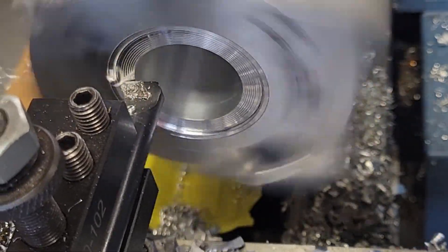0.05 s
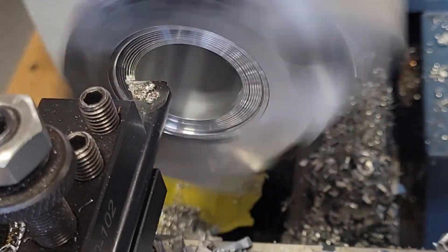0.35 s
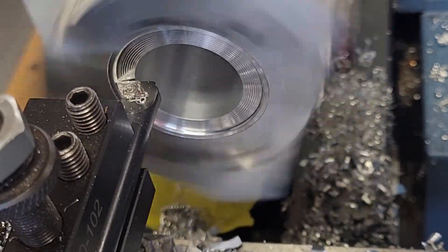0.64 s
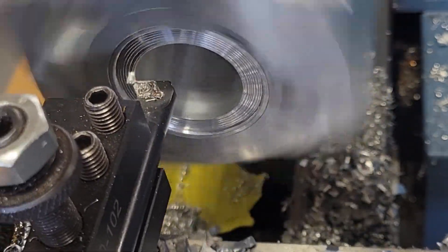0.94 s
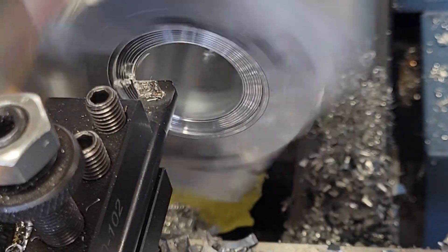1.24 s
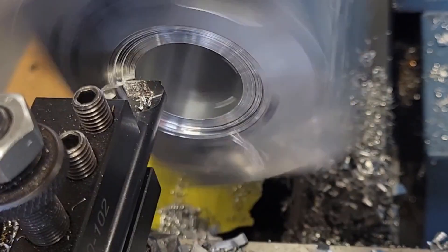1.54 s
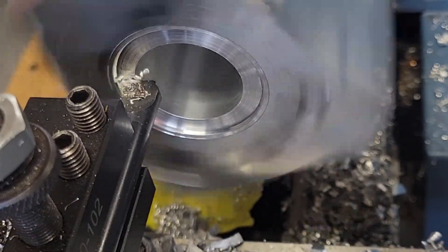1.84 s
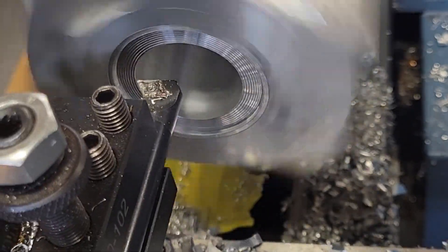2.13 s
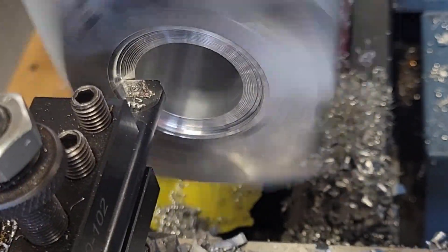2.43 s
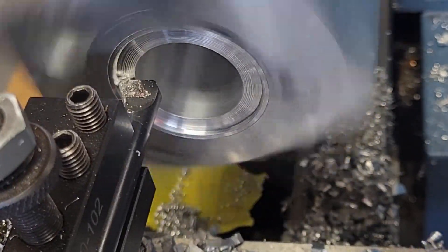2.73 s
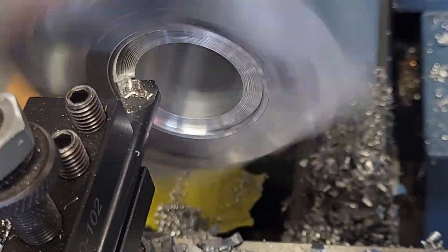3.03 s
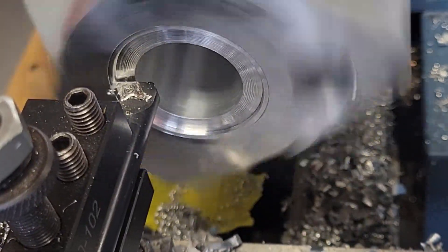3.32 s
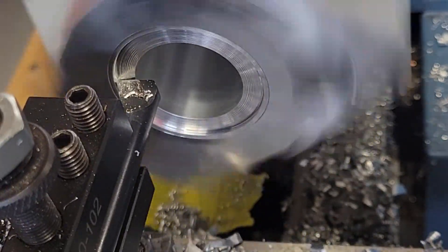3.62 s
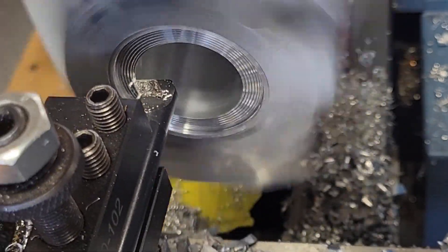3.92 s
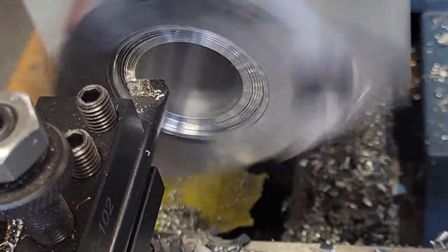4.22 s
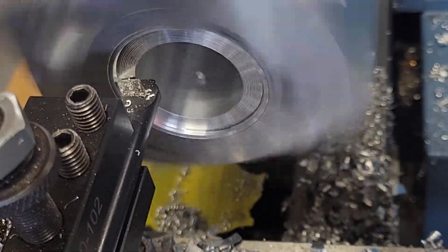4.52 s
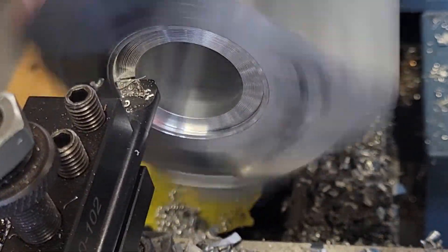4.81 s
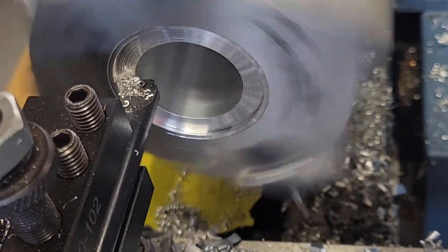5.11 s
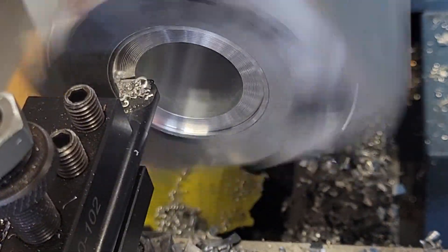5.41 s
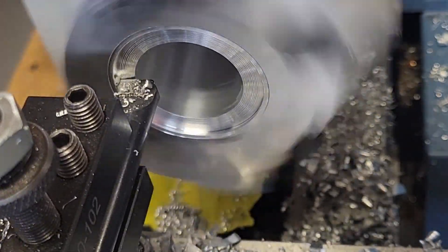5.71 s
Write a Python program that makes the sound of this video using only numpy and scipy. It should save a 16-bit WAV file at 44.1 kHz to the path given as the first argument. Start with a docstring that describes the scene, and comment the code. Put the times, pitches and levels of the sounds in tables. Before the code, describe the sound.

Close above the cutting tool in a workshop, a lathe scrapes a spinning metal part in rapid, gritty strokes over a steady rubbing hiss. The cut comes in uneven surges, with short squeals in the gaps and crisp snaps as jammed chips break free. After a louder crackling stretch in the first half, it keeps surging, then settles into steadier chatter with a thin metallic ring. A faint gear whine runs throughout.

```python
"""Lathe facing a metal ring

Chip after chip catches, runs and breaks off, shearing in quick strong-weak strokes of tiny fractures
that ring tool, work and chuck. The tool rubs and hisses throughout and squeals, mostly between chips.
Jammed chips crack free; drive and gears whine faintly. Heard above the tool post in a workshop."""
import sys
import numpy as np
from scipy import signal
from scipy.fft import rfft, irfft, next_fast_len
from scipy.io import wavfile
from scipy.ndimage import uniform_filter1d

SR = 44100
rng = np.random.default_rng(int(sys.argv[2]) if len(sys.argv) > 2 else 0)


def generate_wav(signal):
    """Clip the signal to [-1, 1] and save it as 16-bit WAV at the path in sys.argv[1]."""
    frames = np.transpose(np.atleast_2d(signal))
    scaled = np.clip(frames, -1, 1) * 32767
    pcm = np.round(scaled).astype(np.int16)
    wavfile.write(sys.argv[1], SR, pcm)


N = 258243
TIME_S = np.arange(N) / SR
N_FFT = next_fast_len(N)
FREQ_HZ = np.maximum(np.arange(N_FFT // 2 + 1) * SR / N_FFT, 1)
SKIM_SCRAPE_DB = -36  # between chips

# contact spectra ahead of the metal's resonances: freq_hz, gain_db
TEAR_SPECTRUM = [(100, -53), (300, -47), (600, -30), (900, -10.5), (1300, -10.5), (1800, -1), (2300, 7.5),
                 (3000, -11.5), (3700, -4), (5000, 3), (8000, -76), (15000, -42)]
SHANK_SPECTRUM = [(1200, -35.5), (2000, -13.5), (2500, -0.5), (2750, -3), (3100, -7), (3700, 3),
                  (4400, -25), (8000, -36)]
SCRAPE_SPECTRUM = [(200, -73), (700, -23), (1500, -15.5), (2600, -20), (3400, -4.5), (4200, -1), (5200, 2),
                   (6500, -2.5), (8000, -6.5), (11000, -10), (15500, -5)]


def cut(metal, unloaded_hz=88.02, sag_hz=5.5, full_load_db=-30, jitter_strokes=.08):
    """Each stroke tears, scrapes the chip, bends the shank and rubs the flank; load slows the strokes."""
    # flank rub: freq_hz, gain_db
    rub_spectrum = [(200, -37.5), (700, -18), (1300, -17), (2500, -14.5), (4000, -20.5), (5500, -16),
                    (7500, 2), (9000, -1), (11000, 0.5), (15500, -1.5)]
    tear_gain, shank_gain, scrape_gain, sing_gain, depth = chip_engagement()
    load = uniform_filter1d(tear_gain, SR // 10) / undb(full_load_db)
    strokes = np.cumsum(unloaded_hz - sag_hz * load) / SR + jitter_strokes * wander(80)
    # the rub grows as the tool feeds in, and with the scrape
    rub_gain = undb(-35.5 + .5 * TIME_S) * (scrape_gain / undb(SKIM_SCRAPE_DB)) ** .15
    shear = stroke_force(strokes, depth, lag=.1, crest=.4, weak_db=-4, scatter_db=1.2)
    bend = stroke_force(strokes, depth, lag=.33, crest=.5, weak_db=-4, scatter_db=1.1)
    drag = stroke_force(strokes, .8 * depth, lag=.12, crest=.55, weak_db=-5, scatter_db=.8)
    # the flank touches going in and springing back
    touch = stroke_force(2 * strokes, .5 * depth, lag=.6, crest=.45, weak_db=-2, scatter_db=.6)
    tear = contact(shear, TEAR_SPECTRUM, metal, grit_db=3.8) * tear_gain
    shank = contact(bend, SHANK_SPECTRUM, metal, grit_db=2) * shank_gain * undb(.8 * wander(110))
    scrape = contact(drag, SCRAPE_SPECTRUM, metal, grit_db=2.5) * scrape_gain
    rub = contact(touch, rub_spectrum, metal, grit_db=2.5) * rub_gain
    dip_db = lull_db()
    hiss = chip_curl(undb(dip_db) * scrape + undb(.45 * dip_db) * rub)
    singing = sing_gain * shank_singing(bend, metal)
    return undb(dip_db) * (tear + shank) + hiss + singing + tool_ring(strokes, metal)


def chip_engagement(catch_s=.012, break_s=.01):
    """Four gains and a stroke depth: each chip catches, eases or tightens, then breaks back to a skim."""
    # start_s, end_s, tear_db, shank_db, scrape_db, sing_db, ease_db, stroke_depth
    chips = [(0, 0.236, -43.5, -38, -34.5, -52, -0.5, 0.41),
             (0.284, 0.361, -49.5, -41.5, -38.5, -61, -4.5, 0.33),
             (0.362, 0.545, -41, -36.5, -35, -55, 3.5, 0.4), (0.53, 0.767, -49, -50, -37.5, -51, -3, 0.2),
             (0.774, 0.997, -43, -37, -33.5, -45, 1, 0.5),
             (1.211, 1.312, -38.5, -39.5, -34.5, -35.5, -1, 0.47),
             (1.327, 1.486, -32, -36.5, -33, -40, 0.5, 0.2),
             (1.485, 1.718, -30, -33.5, -32, -39, 5.5, 0.22),
             (1.715, 1.913, -36.5, -42.5, -31.5, -50, 7.5, 0.24),
             (1.917, 2.112, -47.5, -40.5, -34.5, -50, -2, 0.46),
             (2.228, 2.46, -40.5, -39, -36, -43.5, 3, 0.2), (2.44, 2.91, -45.5, -44, -34, -51, 1.5, 0.37),
             (2.917, 3.192, -40, -40, -33, -44.5, 8, 0.3), (3.342, 3.629, -37, -38, -31.5, -47, 8.5, 0.4),
             (3.636, 3.762, -49.5, -48.5, -39, -47, -3, 0.44),
             (3.783, 3.97, -45, -37.5, -34.5, -46.5, 4.5, 0.3),
             (4.101, 4.426, -37, -36, -33.5, -40.5, -1.5, 0.47),
             (4.44, 4.592, -41.5, -45, -40.5, -66, 14, 0.36),
             (4.596, 4.797, -51.5, -47.5, -39, -41.5, -11.5, 0.53),
             (4.799, 4.869, -37.5, -41, -33.5, -33.5, 7, 0),
             (4.876, 5.216, -41, -42.5, -34, -41.5, 0, 0.33),
             (5.213, 5.6, -43.5, -46.5, -33.5, -41.5, -1.5, 0.4),
             (5.602, 5.86, -45, -48, -32.5, -39, 1, 0.43)]
    t = TIME_S[::SR // 1000]
    gains = undb([-50, -61, SKIM_SCRAPE_DB, -89])[:, None]  # skim: tear, shank, scrape, sing
    depth = .056
    for start_s, end_s, tear_db, shank_db, scrape_db, sing_db, ease_db, stroke_depth in chips:
        hold = np.clip((t - start_s) / catch_s, 0, 1) * np.exp(-np.maximum(t - end_s, 0) / break_s)
        eased_db = ease_db * np.clip((t - start_s) / (end_s - start_s), 0, 1)
        levels_db = tear_db - eased_db, shank_db - .25 * eased_db, scrape_db, sing_db
        gains = np.maximum(gains, [hold * undb(db) for db in levels_db])
        depth = depth + hold * (stroke_depth - depth)
    return [np.interp(TIME_S, t, control) for control in (*gains, depth)]


def stroke_force(strokes, depth, lag, crest, weak_db, scatter_db):
    """Steady drag plus a surge per stroke, every second one offset by weak_db; lag, crest in strokes."""
    index, age = np.divmod(strokes + 2 - lag, 1)
    index = index.astype(int)
    size = undb(scatter_db * rng.standard_normal(N // 100)[index] + weak_db * (index % 2))
    surge = unit_rms(size * np.interp(age, [0, crest, 1], [0, 1, 0]) ** 2)
    return unit_rms(1 - depth + depth * surge)


def contact(force, spectrum, metal, grit_db):
    """Dense micro-fractures of uneven size ring the metal; stereo, rms 1."""
    sizes = undb(grit_db * np.repeat(rng.uniform(-1.7, 1.7, N // 16 + 1), 16)[:N])
    grains = stereo_spectrum(rng.standard_normal((3, N)) * sizes * force)
    return unit_rms(irfft(grains * metal * undb(over_freq(spectrum)), N_FFT)[:, :N])


def metal_response():
    """Left and right frequency response of tool, work and chuck; each mode rings on once struck."""
    # freq_hz, width_hz, left_db, right_db
    modes = [(960.0, 105.0, 12.5, 13.5), (1165.0, 60.0, 5.0, 9.5), (1444.0, 204.0, 10.5, 11.0),
             (1780.0, 199.0, 8.5, 9.0), (2232.0, 134.0, 3.0, 3.5), (2635.0, 170.0, 11.5, 10.0),
             (2822.0, 122.0, 3.0, 6.5), (3040.0, 379.0, 16.5, 11.0), (3295.0, 118.0, 2.0, 5.0),
             (3630.0, 200.0, 2.0, 4.5), (3860.0, 120.0, 4.0, 6.0), (4310.0, 149.0, 2.5, 3.5),
             (5020.0, 160.0, 6.5, 5.0), (5585.0, 210.0, 2.0, 8.0), (6009.0, 84.0, 4.0, 10.0),
             (6582.0, 410.0, 4.0, 6.0), (6895.0, 132.0, 8.5, -0.0), (7292.0, 333.0, 7.0, 8.5),
             (7690.0, 200.0, 4.5, 6.0), (8378.0, 455.0, 6.0, 6.5), (8731.0, 196.0, 7.5, 1.0),
             (8910.0, 125.0, 3.5, 9.5), (9304.0, 664.0, 5.5, 8.5), (10110.0, 260.0, 6.5, 8.0),
             (10765.0, 150.0, 0.5, 4.0), (11201.0, 438.0, 4.5, 8.5), (11649.0, 150.0, 1.5, 5.5),
             (12295.0, 435.0, 3.5, 4.0), (12860.0, 190.0, 3.5, 8.0), (13445.0, 700.0, 3.5, 5.5),
             (14705.0, 465.0, 3.5, -2.0)]
    # where the parts' motions cancel: freq_hz, width_hz, gain_db
    notches = [(1272, 80, -3.5), (3400, 100, -3.5), (4650, 300, -2.5), (7920, 200, -2.5)]
    # parts radiate with different signs, so the sides differ in phase: freq_hz, lead_rad
    left_lead = [(2400, 0), (2750, -.7), (3100, -2.6), (3380, -3.1), (3500, 0), (3950, -.2), (4150, -2.4),
                 (4500, -2.4), (4700, -1), (5300, -1.7), (5550, .7), (6050, 0), (6500, -2.7), (6850, .3),
                 (7100, -2.4), (8000, -3), (8450, -2.1), (8650, 0), (8850, -2.3), (9500, -3), (9900, -1.7),
                 (10600, -2.6), (11600, -.6), (11950, -3), (12900, -1.5), (14600, -3.3), (15100, -.4)]
    mode_hz, width_hz, left_db, right_db = np.transpose(modes)
    peaks = 1 / (1 + (2 * (FREQ_HZ[:, None] - mode_hz) / width_hz) ** 2)
    dips_db = sum(db / (1 + (2 * (FREQ_HZ - hz) / span_hz) ** 2) for hz, span_hz, db in notches)
    log_gain = np.log(undb([peaks @ left_db + dips_db, peaks @ right_db + dips_db]))
    cepstrum = irfft(log_gain, N_FFT)
    minimum_phase = rfft(2 * cepstrum.mean(0)[:N_FFT // 2], N_FFT).imag
    phase = np.array([minimum_phase, minimum_phase - over_freq(left_lead)])
    return np.exp(log_gain + 1j * phase)


def lull_db(edge_s=.015):
    """The level dips where the tool barely touches."""
    # start_s, end_s, dip_db
    lulls = [(0.243, 0.315, -1), (1.005, 1.1, -1), (1.1, 1.202, -5), (2.12, 2.225, -2), (3.19, 3.337, -1),
             (3.644, 3.76, -1), (3.982, 4.094, -3)]
    return sum(dip_db * np.clip(np.minimum(TIME_S - start_s, end_s - TIME_S) / edge_s + .5, 0, 1)
               for start_s, end_s, dip_db in lulls)


def chip_curl(hiss, drift_db=.6, flicker_db=1.3):
    """As the chip curls, each band of the hiss drifts and flickers on its own."""
    # centre_hz
    bands = [3000, 4400, 5200, 6000, 7000, 8000, 9000, 10200, 11400, 12800, 14500]
    spectrum, out = rfft(hiss, N_FFT), 0
    for weights in np.eye(len(bands)):
        band = irfft(spectrum * np.interp(FREQ_HZ, bands, weights), N_FFT)[:, :N]
        out = out + band * undb(drift_db * wander(12) + flicker_db * wander(190))
    return out


def shank_singing(bend, metal, wander_hz=72, octave_db=-11, flutter_db=5):
    """Strokes pump the shank's bending mode; it sputters and wanders, and the chip slaps an octave up."""
    # settles higher in steady chatter: time_s, pitch_hz
    bending_mode = [(0, 2648), (4.6, 2669), (4.85, 2776), (5.2, 2690), (5.55, 2753), (5.66, 2690),
                    (5.86, 2793)]
    phase = phase_rad(over_time(bending_mode) + wander_hz * wander(420))
    grip = undb(flutter_db * np.tanh(wander(130)))
    slap = undb(octave_db + flutter_db * np.tanh(wander(86)))
    return resonate(bend * grip * (np.sin(phase) + slap * np.sin(2 * phase)), metal)


def tool_ring(strokes, metal, pitch_hz=5590, wander_hz=55):
    """A thin high ring pulses once per strong stroke and grows when steady chatter sets in."""
    # time_s, level_db
    envelope = [(0, -67), (4.5, -60), (4.65, -49), (4.9, -46.5), (5.5, -44), (5.7, -52), (5.86, -55)]
    pulse = stroke_force(strokes / 2, depth=.65, lag=.1, crest=.4, weak_db=0, scatter_db=2)
    tone = pulse * np.sin(phase_rad(pitch_hz + wander_hz * wander(500)))
    return undb(over_time(envelope)) * resonate(tone, metal)


def snags(metal):
    """A jammed chip snaps with a short crack: it tears, flicks the shank and scrapes off."""
    # centre_s, half_length_s, tear_db, shank_db, scrape_db
    jams = [(.083, 0.0057, -40, -33.5, -44), (.167, 0.0058, -40, -34, -44), (0.426, 0.0051, -40, -32, -44),
            (0.866, .007, -36, -31, -44), (1.236, 0.0074, -27.5, -33, -38), (1.253, 0.012, -23, -28, -36),
            (1.267, 0.0069, -26.5, -29, -44), (1.279, 0.013, -30, -29, -38), (1.348, 0.0072, -34, -29, -38),
            (1.396, 0.0062, -27.5, -38, -35), (1.414, 0.0088, -27.5, -36, -42),
            (1.446, .007, -34, -28, -40), (1.512, 0.0065, -28, -31, -36), (1.534, 0.0071, -26, -35, -31),
            (1.555, .006, -27, -33, -33), (1.567, 0.0085, -24.5, -30, -29), (1.585, 0.011, -28, -31, -35),
            (1.604, 0.01, -23, -40, -32), (1.655, .006, -32, -25.5, -35), (1.679, 0.0044, -28, -27, -29),
            (1.7, 0.0046, -31, -26, -38), (1.77, 0.0043, -37, -38, -23), (1.79, 0.0037, -41, -33, -27),
            (1.816, 0.0024, -34, -34, -27), (1.837, 0.0035, -40, -42, -34), (1.852, .004, -38, -46, -34),
            (1.9, 0.0052, -38, -41, -26.5), (2.258, 0.0089, -38.5, -32.5, -43),
            (2.287, .008, -34, -30, -42), (2.338, 0.0085, -31, -34, -42), (2.359, 0.0086, -35, -29, -36),
            (2.383, 0.0073, -43, -32, -34), (2.432, 0.008, -42, -29, -28), (2.567, 0.0045, -39, -27.5, -42),
            (2.948, .008, -36, -32, -40), (3.386, 0.015, -28.5, -30, -34), (3.408, .009, -31, -31, -38),
            (3.487, 0.0039, -35, -40, -39), (3.623, .007, -43, -32.5, -32), (4.121, 0.0054, -33, -30, -46),
            (4.151, 0.0066, -30.5, -30, -37), (4.2, .008, -27.5, -36, -38), (4.248, .005, -31, -29, -42),
            (4.346, 0.01, -36, -40, -31), (4.366, .005, -39, -27.5, -29), (4.411, 0.0056, -45, -39, -41),
            (4.633, 0.0065, -46, -33.5, -49), (4.825, 0.0067, -45, -29.5, -36),
            (4.843, 0.0091, -40, -29, -40), (5.642, .006, -36, -30.5, -40), (5.784, .007, -43, -29.5, -32)]
    pushes = np.zeros((3, N))
    for centre_s, half_length_s, *levels_db in jams:
        pushes += undb(levels_db)[:, None] * swell(centre_s, 2 * half_length_s)
    spectra = TEAR_SPECTRUM, SHANK_SPECTRUM, SCRAPE_SPECTRUM
    return sum(push * contact(1, spectrum, metal, grit_db=1.5) for push, spectrum in zip(pushes, spectra))


def cross_slide():
    """Two jams, near 1.25 s and 3.4 s, jolt the heavy slide, which rings briefly."""
    # start_s, rise_s, level_db
    jolts = [(1.235, .015, -28), (1.249, .012, -26), (3.375, .016, -32), (3.399, .021, -31)]
    # pitch_hz, gain_db, t60_s
    modes = [(522, -25.5, .18), (935, -7, .08), (1155, 0, .09)]
    out, t = np.zeros(N), TIME_S[:SR // 3]
    for start_s, rise_s, level_db in jolts:
        ring = sum(undb(gain_db - 60 * t / t60_s) * np.sin(2 * np.pi * (pitch_hz * t + rng.random()))
                   for pitch_hz, gain_db, t60_s in modes)
        start = int(start_s * SR)
        out[start:start + len(t)] += undb(level_db) * ring * np.minimum(t / rise_s, 1)
    return out


def squeals(waver_share=.006, flutter_db=1.3, skirt_share=.25):
    """The lightly loaded edge sings in arches and glides; a faint skirt leads in and trails off."""
    # centre_s, length_s, pitch_hz, sag_hz, glide_hz_per_s, level_db
    notes = [(.0, .08, 1480, 220, 0, -51), (.255, .11, 1497, 300, 0, -48), (.3, .11, 1950, 0, 1900, -49),
             (.6, .12, 1468, 200, 200, -53), (.66, .14, 1870, 80, 0, -53), (1.035, .13, 1500, 340, 0, -49),
             (1.13, .2, 2840, -60, -950, -50), (1.17, .12, 1820, 60, 0, -52),
             (1.79, .17, 1515, 400, 0, -41.5), (2.14, .11, 1490, 320, -300, -52),
             (2.17, .13, 2910, 0, -700, -52), (2.495, .1, 1500, 360, 0, -47), (2.88, .12, 1810, 60, 0, -51),
             (3.14, .12, 1820, 60, 0, -52), (3.2, .08, 1480, 150, 0, -54), (3.29, .1, 2860, 90, -500, -53),
             (3.33, .07, 1815, 60, 0, -49), (3.5, .07, 1490, 170, 0, -51),
             (3.655, .11, 1475, 280, 0, -48.5), (4.005, .12, 1485, 280, 0, -51),
             (4.06, .09, 2890, 40, -900, -50.5), (4.46, .24, 1485, 200, 0, -43.5),
             (4.66, .08, 1780, 40, -400, -49)]
    out, waver = np.zeros(N), 1 + waver_share * wander(220)
    for centre_s, length_s, pitch_hz, sag_hz, glide_hz_per_s, level_db in notes:
        skirt = skirt_share * swell(centre_s, 2.6 * length_s)
        envelope = (1 - skirt_share) * swell(centre_s, length_s) + skirt
        on = envelope > 0
        offset_s = TIME_S[on] - centre_s
        arch_hz = pitch_hz + glide_hz_per_s * offset_s - sag_hz * np.tanh((offset_s / length_s) ** 2)
        out[on] += undb(level_db) * envelope[on] * np.sin(phase_rad(arch_hz * waver[on]))
    return np.sqrt(2) * out * undb(flutter_db * wander(170))


def chip_squeak(at_s=3.903, pitch_hz=15690):
    """One very high, thin squeak builds up and snaps off."""
    build_up = undb(-41) * swell(at_s - .012, .07)
    peak = undb(-30) * swell(at_s, .016) + undb(-35) * swell(at_s + .003, .03)
    return (build_up + peak) * np.sin(phase_rad(pitch_hz + 60 * wander(300)))


def gears(waver_hz=9, flutter_db=3):
    """Meshing gears whine faintly on a few unsteady notes."""
    # pitch_hz, level_db
    notes = [(969, -70), (1174, -70), (1405, -73)]
    out = np.zeros(N)
    for pitch_hz, level_db in notes:
        gain = undb(level_db + flutter_db * wander(45))
        out += gain * np.sin(phase_rad(pitch_hz + waver_hz * wander(40)))
    return np.sqrt(2) * out


def drive(metal, rush_db=-53.5, sway_db=1.3, waver_hz=2):
    """The drive whines faintly over the rush of gears and spinning chuck."""
    # time_s, pitch_hz, level_db
    whine_track = [(0, 616, -67), (.2, 611, -81), (.35, 622, -66.5), (.6, 615, -62), (.7, 606, -78),
                   (1.3, 589.4, -69), (2.25, 557.6, -83.5), (2.6, 616, -70), (3.0, 619, -69.5),
                   (3.6, 597, -69), (3.85, 602, -64.5), (4.2, 600, -63.5), (4.5, 601, -77),
                   (5.86, 625, -84)]
    # freq_hz, gain_db
    rush_spectrum = [(25, -28), (100, -34), (200, -18.5), (340, -5.5), (480, -17), (700, 1), (950, -1.5),
                     (1250, -11), (1900, 12), (2500, -3.5), (4000, -18), (8000, -31)]
    whine = np.sqrt(2) * np.sin(phase_rad(over_time(whine_track) + waver_hz * wander(40)))
    rush = contact(undb(sway_db * wander(17)), rush_spectrum, metal, grit_db=4)
    return whine * undb(over_time(whine_track, column=2) + wander(29.86)) + undb(rush_db) * rush


def workshop(x, t60_s=.22, wet_db=-16):
    """Short diffuse reflections from lathe bed and walls."""
    t = TIME_S[:SR // 2]
    tails = rng.standard_normal((3, len(t))) * undb(-60 * t / t60_s) * (t > .002)
    tails /= np.linalg.norm(tails, axis=1, keepdims=True)
    impulse = irfft(stereo_spectrum(tails), N_FFT)[:, :len(t)]
    return x + undb(wet_db) * signal.fftconvolve(x, impulse, axes=1)[:, :N]


def stereo_spectrum(noises):
    """Mix common, left and right noise; in the treble each side hears other parts of the metal."""
    # freq_hz, common_share
    coherence = [(30, .6), (250, .82), (600, .88), (1500, .98), (2300, .99), (2800, .68), (3300, .5),
                 (3700, .8), (4300, .5), (8000, .62), (15000, .55)]
    common, *sides = rfft(noises, N_FFT)
    share = over_freq(coherence)
    return np.sqrt(share) * common + np.sqrt(1 - share) * np.array(sides)


def resonate(tone, metal):
    """A tone through the metal's resonances; stereo, rms 1."""
    return unit_rms(irfft(rfft(tone, N_FFT) * metal, N_FFT)[:, :N])


def wander(rate_hz):
    """Smooth random curve, spread near 1."""
    hold = int(SR / rate_hz)
    steps = np.repeat(rng.standard_normal(N // hold + 1), hold)
    return 1.3 * uniform_filter1d(uniform_filter1d(steps, hold), hold)[:N]


def swell(centre_s, length_s):
    """Raised-cosine rise and fall."""
    out = np.zeros(N)
    near = slice(*np.searchsorted(TIME_S, [centre_s - length_s / 2, centre_s + length_s / 2]))
    out[near] = np.cos(np.pi * (TIME_S[near] - centre_s) / length_s) ** 2
    return out


def over_time(table, column=1):
    """One column, interpolated in time."""
    rows = np.array(table)
    return np.interp(TIME_S, rows[:, 0], rows[:, column])


def over_freq(table):
    """Points interpolated over log frequency."""
    hz, value = np.transpose(table)
    return np.interp(np.log(FREQ_HZ), np.log(hz), value)


def phase_rad(hz):
    """Running phase of a changing pitch."""
    return 2 * np.pi * np.cumsum(hz) / SR


def unit_rms(x):
    """Scale to rms 1."""
    return x / np.sqrt(np.mean(x ** 2))


def undb(db):
    """Decibels to gain."""
    return 10 ** (np.asarray(db) / 20)


def scene():
    """The cut and the running machine in the workshop."""
    metal = metal_response()
    cutting = cut(metal) + snags(metal) + cross_slide() + squeals() + chip_squeak()
    return workshop(cutting + gears() + drive(metal))


def record(dry):
    """Steep low-pass on the top treble."""
    cutoff_hz = 15850
    return signal.sosfilt(signal.ellip(12, .2, 80, cutoff_hz, fs=SR, output="sos"), dry)


dry = scene()
out = record(dry)
generate_wav(out)
```